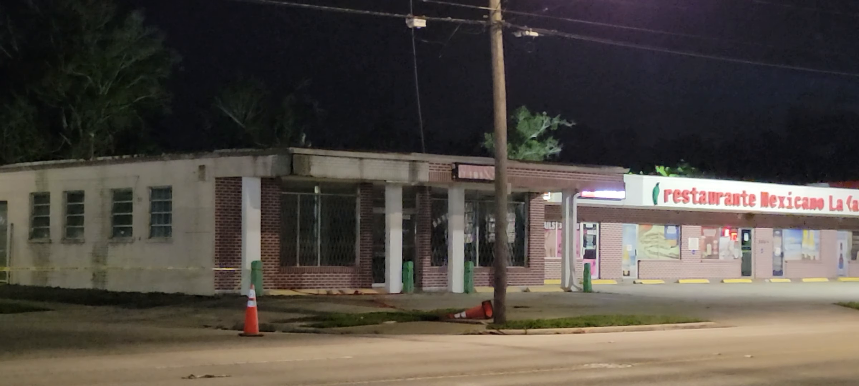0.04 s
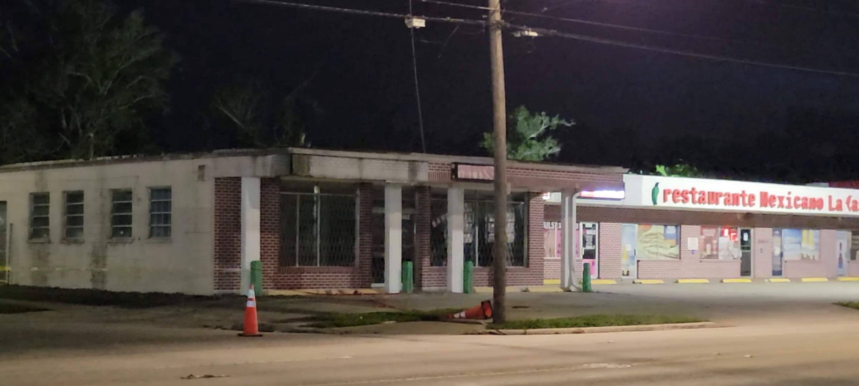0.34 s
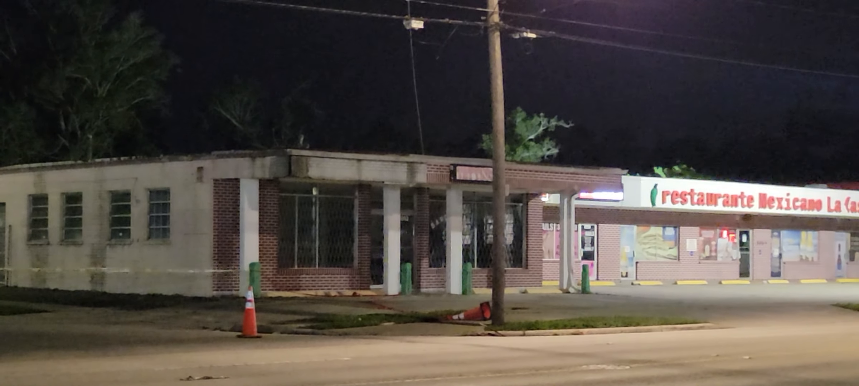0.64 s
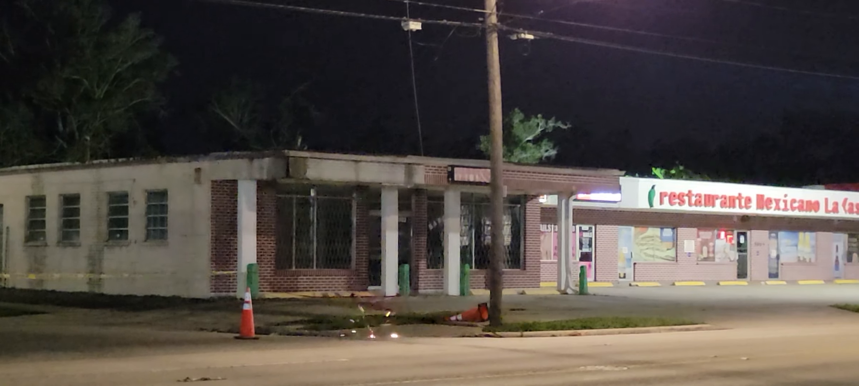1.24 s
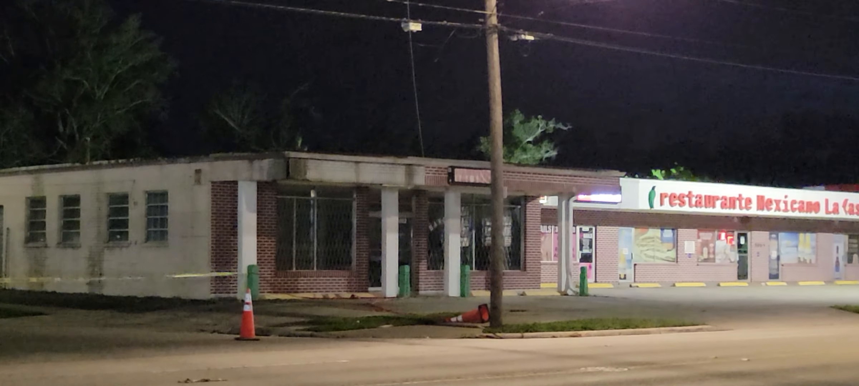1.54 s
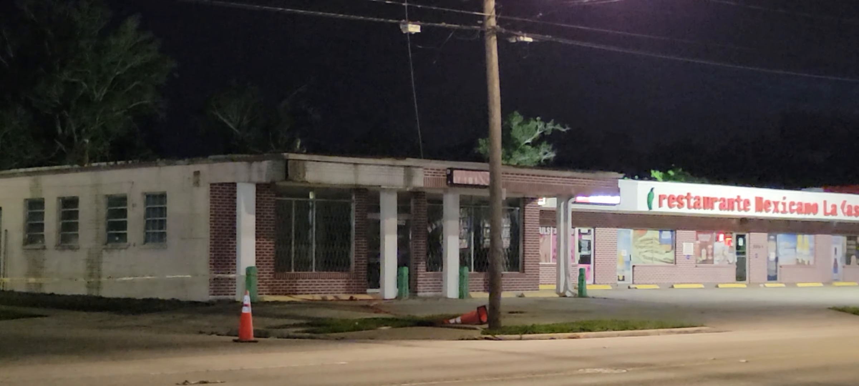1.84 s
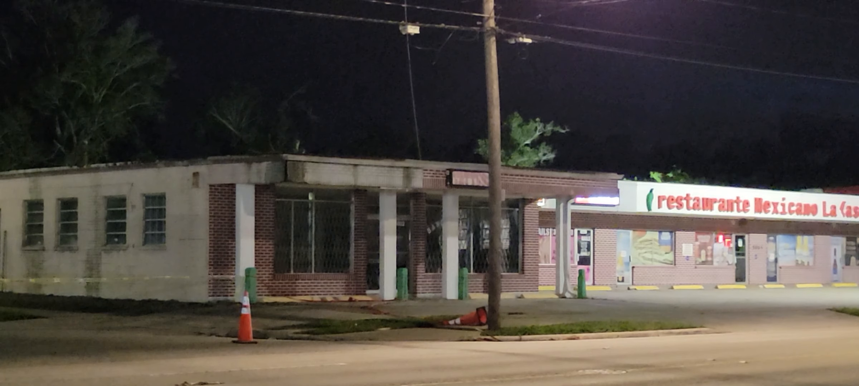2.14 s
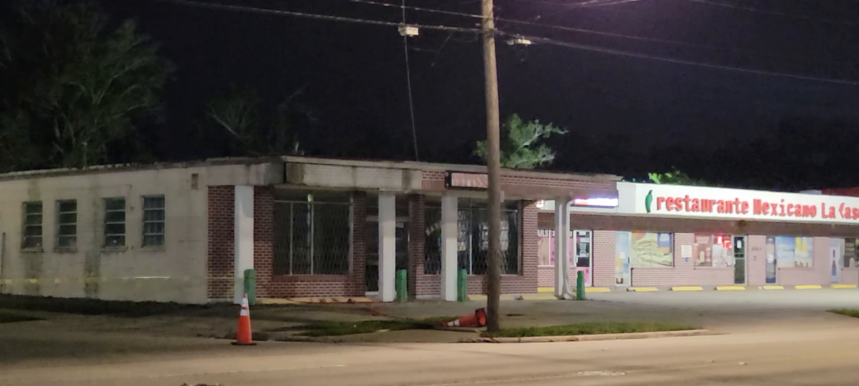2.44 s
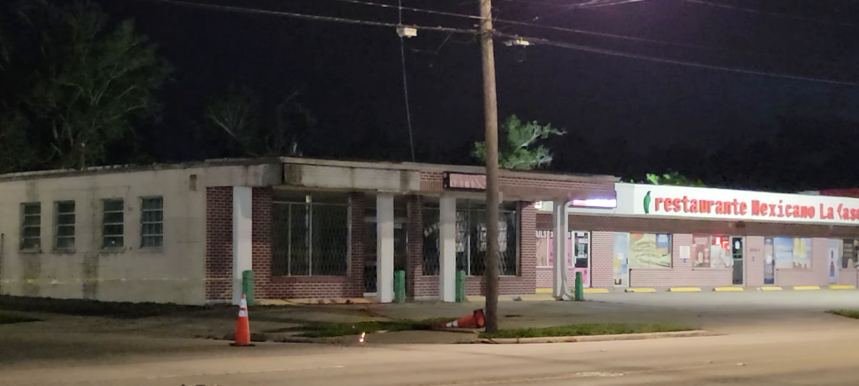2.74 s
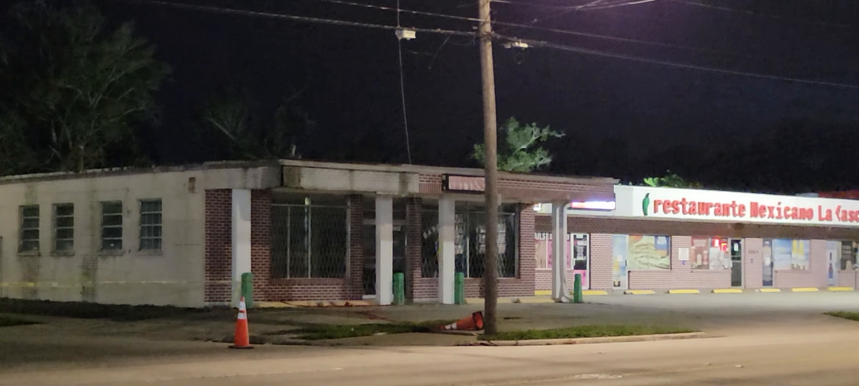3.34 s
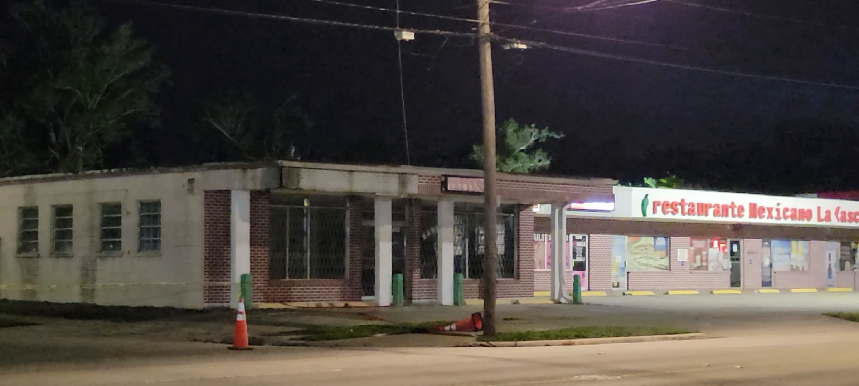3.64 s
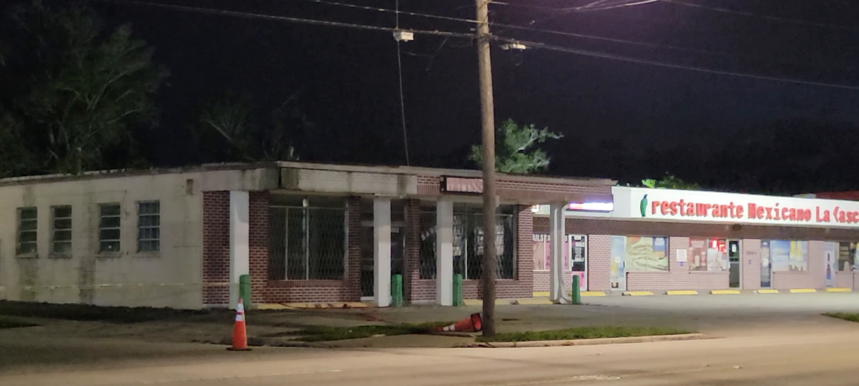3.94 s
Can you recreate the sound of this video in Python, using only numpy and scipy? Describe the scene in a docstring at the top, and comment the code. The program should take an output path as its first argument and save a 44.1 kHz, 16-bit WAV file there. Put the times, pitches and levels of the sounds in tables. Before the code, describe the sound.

A sudden, brief electric crackle bursts from an arcing power line on a night street, followed later by a few small spark pops. Behind it an engine idles, a car fades away and soft ticks repeat over microphone hiss.

```python
"""An engine idles on a night street, over far traffic, a fading car, a rumble of air and microphone hiss.
A faint hissy tick comes about twice a second. Then a power line arcs: one short, crackling buzz,
made of tiny discharges that flare twice in each mains cycle and a hum from the heated air.
It echoes off the shop fronts. Later a few sparks pop and fizz on the pavement."""
import sys
import numpy as np
from scipy import signal
from scipy.fft import rfft, irfft, next_fast_len
from scipy.io import wavfile
from scipy.ndimage import map_coordinates

SR = 44100
rng = np.random.default_rng(int(sys.argv[2]) if len(sys.argv) > 2 else 0)


def wav_record(signal):
    """Record a signal, one row per channel, as 16-bit PCM in the file named by sys.argv[1]."""
    frames = np.transpose(np.atleast_2d(signal))
    bounded = np.clip(frames, -1, 1)
    # unit amplitude maps onto the largest positive 16-bit level
    quanta = np.round(bounded * 32767).astype(np.int16)
    wavfile.write(sys.argv[1], SR, quanta)


N = 176400  # 4 seconds

# how alike left and right are for engine rumble and traffic: pitch_hz, likeness (1 = the same)
STREET_LIKENESS = [(60, 0.98), (220, 0.94), (400, 1), (600, 0.42), (850, 0.49), (1100, 0.7), (1900, 0.74),
                   (3000, 0.23), (8000, 0.063)]
# how alike left and right are for the arc and the sparks: pitch_hz, likeness
SPARK_LIKENESS = [(300, .97), (800, 1), (1200, 0.67), (2100, 1), (3000, 0.17), (5000, 0.52), (14000, 0.24)]


def amp(db):
    """Turn decibels into a number to multiply by."""
    return 10 ** (np.asarray(db) / 20)


def unit(x):
    """Scale a signal so its average strength (rms) is 1."""
    return x / np.sqrt(np.mean(x ** 2) + 1e-20)


def clock():
    """The time of each sample, in seconds."""
    return np.arange(N) / SR


def at_pitch(points, hz):
    """Read between the rows of a (pitch_hz, value) table, on a log pitch scale."""
    pitches, values = np.transpose(points)
    return np.interp(np.log(hz + 1), np.log(pitches + 1), values)


def curves(rows):
    """Join the rows of a table that starts with time_s: one curve for each other column."""
    times, *columns = np.transpose(rows)
    return [np.interp(clock(), times, column) for column in columns]


def wobble(per_second):
    """A smooth curve through this many random values a second."""
    return map_coordinates(rng.standard_normal(256), [clock() * per_second], mode="wrap")


def filtered(x, response):
    """Multiply each frequency in x by response(hz)."""
    size = next_fast_len(N + SR // 2)
    hz = np.fft.rfftfreq(size, 1 / SR)
    return irfft(rfft(x, size) * response(hz), size)[..., :N]


def coloured(x, colour):
    """Shape x with a (pitch_hz, level_db) table, then scale it to strength 1."""
    return unit(filtered(x, lambda hz: amp(at_pitch(colour, hz))))


def white():
    """Two unrelated white noises, left and right."""
    return rng.standard_normal((2, N))


def spread(pair, likeness, left_lead=None):
    """Blend two unrelated signals into left and right; one side may run slightly ahead."""
    def shares(hz):
        """How much is common to both sides, and how much is opposite."""
        angle = np.arccos(np.clip(at_pitch(likeness, hz), -1, 1)) / 2
        return np.array([np.cos(angle), np.sin(angle)])
    common, opposite = filtered(pair, shares)
    stereo = np.array([common + opposite, common - opposite])
    if left_lead is None:
        return stereo
    return filtered(stereo, lambda hz: np.exp(np.outer([1j, -1j], at_pitch(left_lead, hz) / 2)))


def engine():
    """An idling engine: slightly unsteady low tones over an exhaust rumble."""
    # the weaker engine tones: multiple_of_idle_rate, level_db
    weak_tones = [(1, -57.5), (3, -69), (4, -46), (6, -59.5), (8, -59)]
    # the strong low tone as it swells and sinks: time_s, level_db
    boom_levels = [(0, -49), (.25, -40), (.5, -39.5), (.85, -49), (1.12, -36), (1.6, -43), (1.95, -41.5),
                   (2.15, -42), (2.7, -40), (2.95, -42.5), (3.4, -40.5), (4, -46)]
    # the strong higher tone: time_s, level_db
    drone_levels = [(0, -46), (.9, -43), (1.05, -50), (1.25, -45), (1.8, -43.5), (2.3, -42), (2.9, -43),
                    (3.3, -40), (4, -45.5)]
    # the exhaust rumble: pitch_hz, level_db
    rumble_colour = [(12, -59), (22, -20), (32, -5), (42, -1), (55, -1), (100, 1), (135, -1), (180, -2.5),
                     (205, -7), (245, -6.5), (275, -13), (400, -18.5), (800, -59)]
    idle_hz, drift = 30.88, 0.0052
    phase = 2 * np.pi * np.cumsum(idle_hz * (1 + drift * wobble(4.96))) / SR

    def tone(multiple, db):
        """One tone at a whole multiple of the idle rate."""
        return amp(db) * np.sqrt(2) * np.cos(round(multiple) * phase + rng.normal(0, 0.51))
    weak = sum(tone(multiple, db + 4 * wobble(7)) for multiple, db in weak_tones)
    boom = tone(2, curves(boom_levels)[0] + 1.9 * wobble(6.75))
    drone = tone(5, curves(drone_levels)[0] + 1.9 * wobble(7))
    rumble = amp(-42.5) * coloured(spread(white(), STREET_LIKENESS), rumble_colour)
    return weak + boom + drone + rumble


def traffic():
    """Tyre noise from the right: a steady far wash and one car that fades as it drives away."""
    # the wash of far traffic: pitch_hz, level_db
    wash_colour = [(150, -12), (330, -6.5), (520, 3.5), (640, 2), (770, -6), (1020, 3), (1450, 4.5),
                   (1650, -5.5), (1950, -5.5), (2450, -15), (2850, -27), (5000, -35), (10000, -68)]
    # the car's tyres: pitch_hz, level_db
    car_colour = [(150, -12), (300, -1), (520, -1), (770, -10), (1020, 2.5), (1450, 2.5), (2050, -4),
                  (2500, -8), (2900, -23), (4000, -21.5), (10000, -50)]
    # the car fading: time_s, level_db
    car_levels = [(0, -46.5), (.85, -46.5), (1.5, -52.5), (2.4, -53.5), (4, -66)]
    # how far the left side runs ahead (negative = behind): pitch_hz, lead_radians
    left_lead = [(300, 1.84), (600, -1.6), (780, -1.06), (1000, -1.93), (1400, -3), (1700, -5),
                 (2100, -5.5), (3000, -9)]
    wash = coloured(spread(white(), STREET_LIKENESS, left_lead), wash_colour)
    car_db = curves(car_levels)[0] + 0.68 * wobble(7.86)
    car = coloured(spread(white(), STREET_LIKENESS, left_lead), car_colour)
    return amp(-48) * wash + amp(car_db) * car


def hiss():
    """Steady microphone hiss with a shrill high band."""
    # the hiss: pitch_hz, level_db
    colour = [(1500, 3.5), (2850, 8), (3400, 2.5), (4400, 1.5), (5850, 3), (6280, 10.5), (6700, 2.5),
              (8000, -3), (9300, -4), (10300, -16), (11200, -21), (12800, -14.5), (15800, -20)]
    return amp(-59.5) * coloured(white(), colour)


def air():
    """Light air rumbles faintly, differently at each microphone opening."""
    # the rumble of the air: pitch_hz, level_db
    colour = [(12, -20), (27, -6), (40, 0), (60, 14), (90, -9), (160, -8), (400, -54)]
    return amp(-52) * coloured(white(), colour)


def ticks():
    """Each tick is a puff of high noise that rises fast, holds briefly and dies away."""
    # the ticks: start_s, level_db
    puffs = [(.183, -54.5), (0.722, -54.5), (1.824, -53.5), (2.364, -53.5), (2.927, -54), (3.5, -54)]
    # their hissy sound: pitch_hz, level_db
    colour = [(1500, -9), (3500, -9), (5600, 6), (7400, -6), (9300, 0), (11000, -11), (12800, -8.5),
              (15800, -7)]
    rise_s, hold_s, fade_s = 0.002, 0.013, 0.13  # fade_s: time to fall 60 dB
    t = clock()
    level = np.zeros(N)
    for start_s, db in puffs:
        rise = np.clip((t - start_s) / rise_s, 0, 1)
        fallen_db = 60 * np.maximum(t - start_s - hold_s, 0) / fade_s
        level += rise * amp(db - fallen_db)
    return level * coloured(white(), colour)


def crackle():
    """Thousands of tiny discharges of uneven size snap over a smooth sizzle."""
    # narrow peaks that colour the crackle, as from nearby reflections: pitch_hz, width_hz, boost_db
    peaks = [(1056, 33, 11), (1415, 36, 9), (1916, 110, 6), (2137, 61, 9.5), (3540, 90, 7.5),
             (4230, 110, 11), (8930, 110, 10)]
    # how far the left side runs ahead: pitch_hz, lead_radians
    left_lead = [(1000, -1), (1500, -0.7), (2600, 1), (4400, 1.7), (6000, -0.6), (10000, -1.5),
                 (13000, -3.5), (15500, -6)]
    snaps_per_s, scatter_db, sizzle_gain = 3200, 4, 0.44
    fires = rng.random((2, N)) < snaps_per_s / SR
    snaps = fires * np.sign(white()) * amp(scatter_db * np.clip(white(), -2, 2))
    stereo = spread(unit(snaps) + sizzle_gain * white(), SPARK_LIKENESS, left_lead)

    def peak_boost(hz):
        """Boost the pitches close to each peak."""
        return amp(sum(db / (1 + (2 * (hz - centre) / width) ** 2) for centre, width, db in peaks))
    return filtered(stereo, peak_boost)


def arc():
    """The arc flares at each crest of the current: pulses of crackle, and a hum from the heated air."""
    # the arc while it burns: time_s, body_db, treble_db
    levels = [(1.215, -46, -51), (1.226, -47.5, -43.5), (1.25, -42.5, -45), (1.268, -40.5, -39),
              (1.293, -40.5, -42), (1.308, -42.5, -55), (1.332, -44, -52), (1.345, -41, -40),
              (1.354, -38.5, -42)]
    # the body, or middle pitches, of the crackle: pitch_hz, level_db
    body_colour = [(150, -25), (330, -25), (520, 0), (780, -8.5), (1000, -3.5), (1450, -2), (2200, -5),
                   (2650, -4), (2950, -12.5), (4500, -36)]
    # its treble, or high pitches: pitch_hz, level_db
    treble_colour = [(1500, -30), (2950, -14.5), (3400, 2.5), (3750, -4.5), (4400, 0), (6400, 3),
                     (9300, -2.5), (10900, -7), (12600, -4.5), (15800, -13)]
    # the sheen at the very top of the sizzle: pitch_hz, level_db
    sheen_colour = [(8000, -28), (11000, -5), (13000, 0), (15800, -1)]
    # the hum of the pulsing air: multiple_of_flare_rate, level_db (relative to the body)
    hum_tones = [(1, 0), (2, -7), (3, -9.5), (4, -15)]
    on_s, off_s, edge_s = 1.2148, 1.3535, 0.001
    flare_hz, first_flare_s, jitter_s = 120, 1.217, 0.00048  # the flares come a little unevenly
    steady_part, sharpness = 0.51, 3.6  # the crackle carries on between the narrow flares
    sheen_at_s, sheen_width_s = 1.286, 0.017  # a brief swell at the height of the arc
    t = clock()
    body_db, treble_db = curves(levels)
    burning = np.clip((t - on_s) / edge_s, 0, 1) * np.clip((off_s - t) / edge_s, 0, 1)
    phase = np.pi * flare_hz * (t - first_flare_s + jitter_s * wobble(flare_hz))
    flare = unit(steady_part + np.abs(np.cos(phase)) ** sharpness)
    body = amp(body_db) * coloured(crackle(), body_colour)
    treble = amp(treble_db) * coloured(crackle(), treble_colour)
    swell = np.exp(-((t - sheen_at_s) / sheen_width_s) ** 2)
    sheen = amp(-44) * swell * coloured(crackle(), sheen_colour)
    hum = sum(amp(db) * np.sqrt(2) * np.sin(2 * round(multiple) * phase) for multiple, db in hum_tones)
    return burning * (flare * (body + treble + sheen) + amp(body_db) * hum)


def street_echoes(x):
    """Sound bounces off the shop fronts as smeared echoes, with a soft tail that dies away."""
    # echoes from the shop fronts: delay_s, level_db
    walls = [(0.044, -9.5), (0.086, -22), (.128, -27)]
    # how long the tail takes to fall 60 dB: pitch_hz, fade_s
    fade_times = [(200, 0.23), (2000, 0.35), (6000, 1), (14000, 0.58)]
    tail_db, rise_s, smear_s = -4, 0.0095, 0.0021
    hz, frame_s, bands = signal.stft(rng.standard_normal((2, SR)), SR, nperseg=256)
    fade = amp(-60 * frame_s / at_pitch(fade_times, hz)[:, None])
    tail = signal.istft(bands * fade, SR, nperseg=256)[1]
    t = np.arange(tail.shape[1]) / SR
    tail *= 1 - np.exp(-t / rise_s)
    response = amp(tail_db) * tail / np.linalg.norm(tail[0])  # the street's answer to one click
    for delay_s, db in walls:
        echo = rng.standard_normal(tail.shape) * (t >= delay_s) * np.exp(-np.abs(t - delay_s) / smear_s)
        response += amp(db) * echo / np.linalg.norm(echo[0])
    return signal.fftconvolve(x, response, axes=1)[:, :N]


def sparks():
    """Sparks falling on the pavement pop sharply over a brief fizz."""
    # the pops: start_s, level_db
    hits = [(2.733, -66), (2.798, -57), (2.804, -52), (2.814, -53), (2.859, -49), (2.875, -58),
            (2.891, -46), (2.897, -53)]
    # the bright sound of pops and fizz: pitch_hz, level_db
    colour = [(2000, -11), (4500, -1), (8800, 1.5), (10500, -10.5), (12600, -7), (13800, -10), (15800, -26)]
    fade_s, fizz_at_s, fizz_width_s = 0.0065, 2.873, 0.04  # a pop falls 60 dB in fade_s
    t = clock()
    pops = sum((t >= start_s) * amp(db - 60 * np.abs(t - start_s) / fade_s) for start_s, db in hits)
    fizz = amp(-61.5) * np.exp(-((t - fizz_at_s) / fizz_width_s) ** 2)
    return (pops + fizz) * coloured(spread(white(), SPARK_LIKENESS), colour)


def scene():
    """The arc, the sparks and their echoes over the street sounds and microphone hiss."""
    buzz, pops = arc(), sparks()
    echoes = street_echoes(buzz + amp(-10) * pops)  # the sparks stir the street less than the arc
    return buzz + pops + echoes + ticks() + engine() + traffic() + hiss() + air()


def record(dry):
    """Each microphone opening colours the sound its own way; the very highest pitches are cut off."""
    # how the two openings differ: pitch_hz, left_minus_right_db
    balance = [(100, -.5), (500, -1.5), (2600, 1), (3400, 3), (4200, -9.5), (5100, -0.5), (6400, 2.5),
               (7900, -6.5), (8700, 2.5), (10900, 1), (12000, -4), (13600, -3), (14600, -2), (15700, 0)]
    dip_hz, dip_width_hz, dip_db, top_hz = 11070, 290, -8, 15800

    def microphone(hz):
        """Left and right gains, with a narrow dip that both share."""
        sides = amp(np.outer([1, -1], at_pitch(balance, hz)) / 2)
        sides /= np.sqrt(np.mean(sides ** 2, axis=0))  # keep the total power the same
        dip = amp(dip_db * np.exp(-((hz - dip_hz) / dip_width_hz) ** 2))
        return sides * dip * (hz < top_hz)
    return filtered(dry, microphone)


dry = scene()
out = record(dry)
wav_record(out)
```